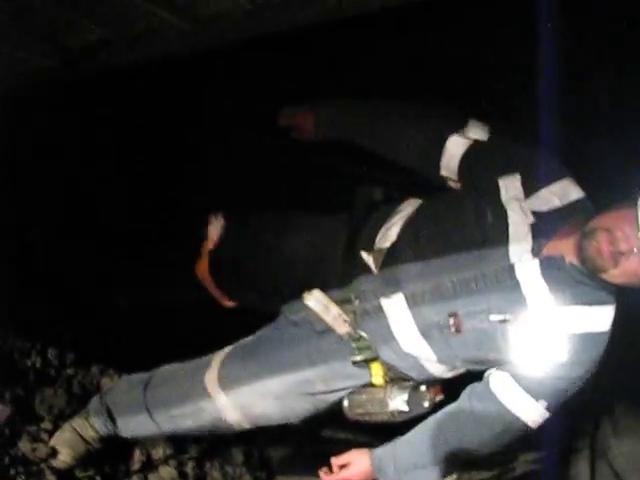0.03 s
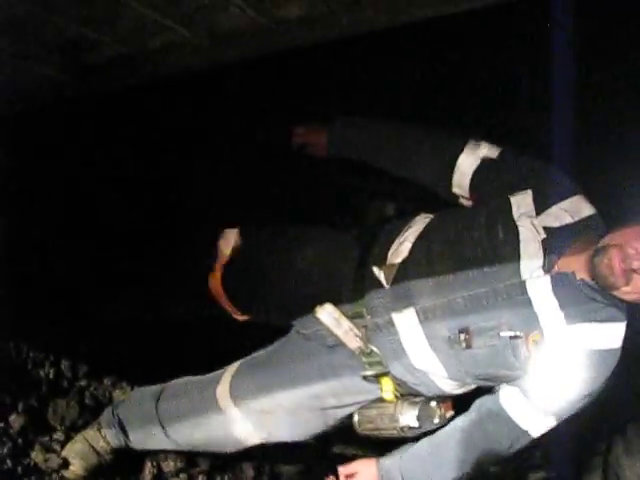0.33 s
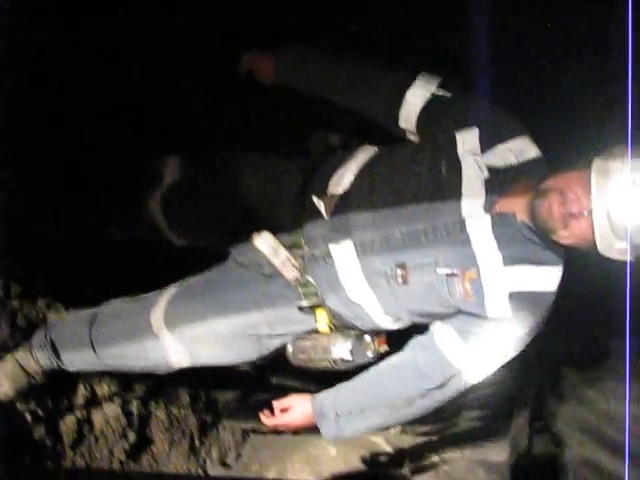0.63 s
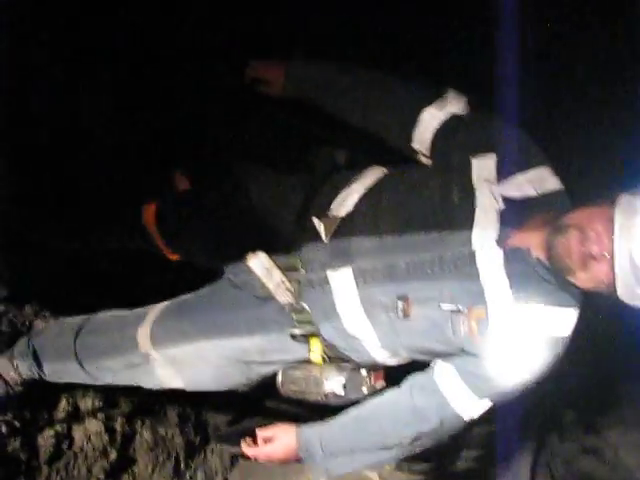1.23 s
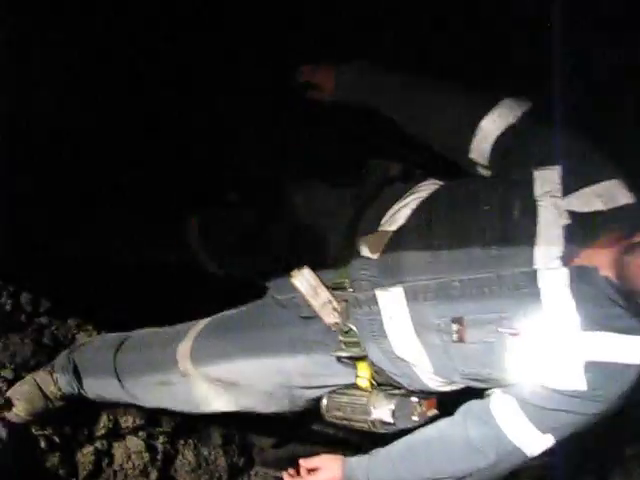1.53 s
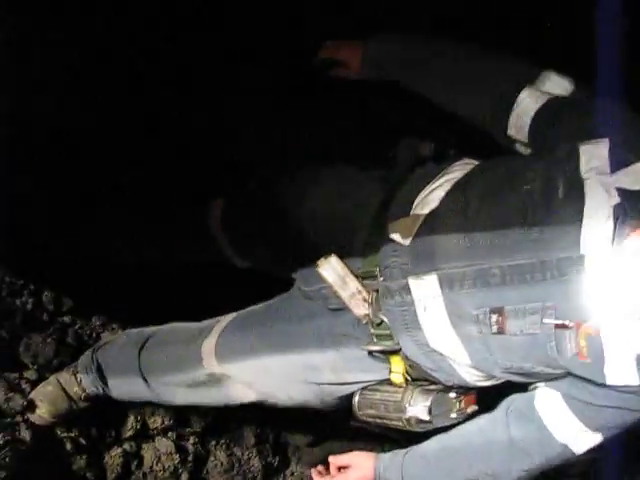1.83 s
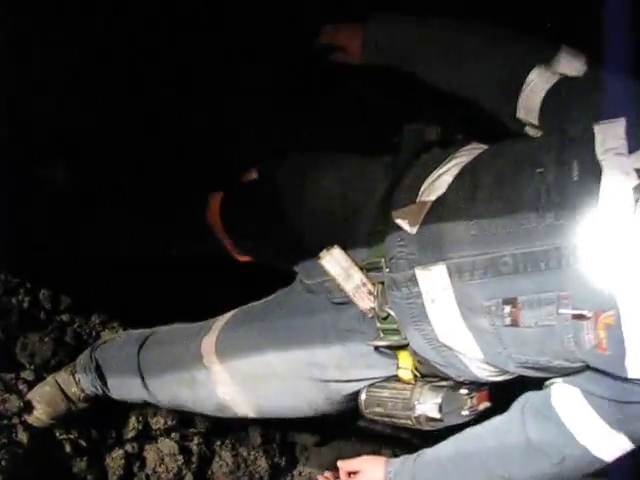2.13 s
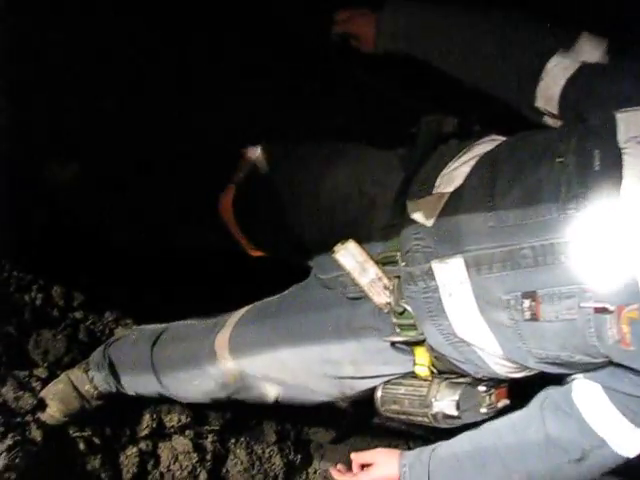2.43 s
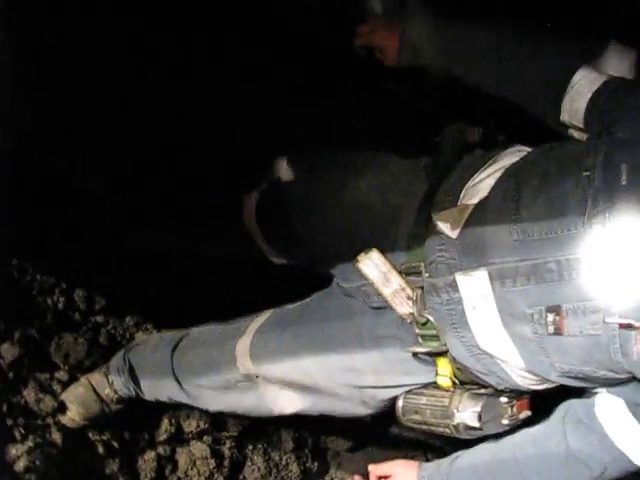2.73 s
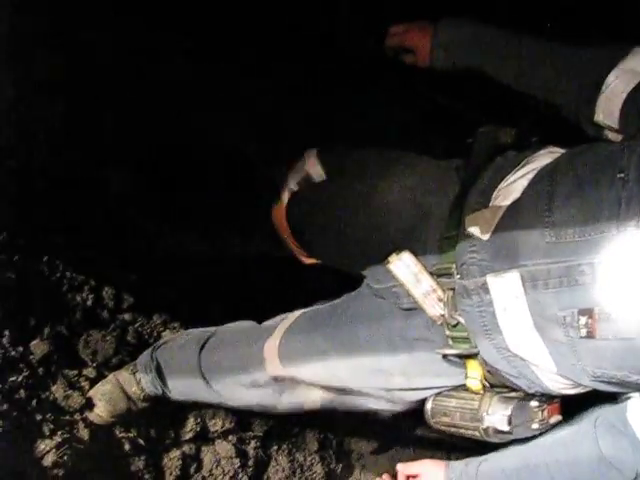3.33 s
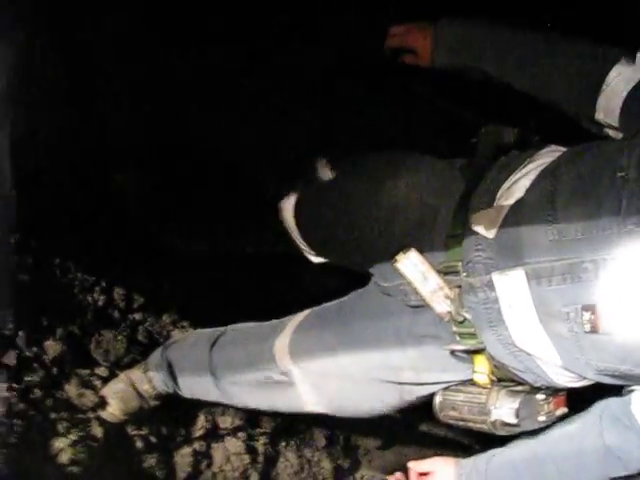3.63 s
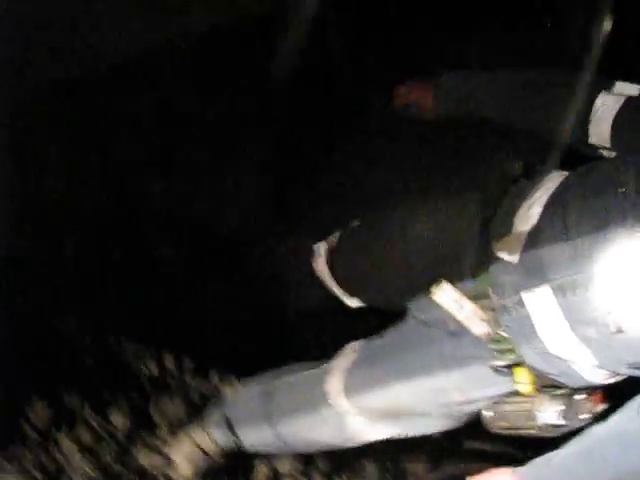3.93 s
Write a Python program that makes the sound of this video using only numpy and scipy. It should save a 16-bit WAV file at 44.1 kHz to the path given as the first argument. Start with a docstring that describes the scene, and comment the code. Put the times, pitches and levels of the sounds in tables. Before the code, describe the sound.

Wind rumbles and buffets the microphone over a steady rush of air in a mine.

```python
"""Ventilation draught in a mine passage

Air rushes steadily along the passage with a roar, hollow resonances and a hiss. The draught hits
the two microphone ports, each in its own way: eddies rumble, grow brighter as it strengthens and
overload the microphone. The strongest gusts spit and crackle. One thin tick sounds, perhaps grit."""
import sys
import numpy as np
from scipy import signal
from scipy.io import wavfile

SR = 44100
rng = np.random.default_rng(int(sys.argv[2]) if len(sys.argv) > 2 else 0)


def persist_wave(psi):
    """Save psi, clipped to +-1, as 16-bit WAV."""
    counts = np.round(np.clip(psi, -1, 1) * 32767).astype(np.int16)
    wavfile.write(sys.argv[1], SR, np.atleast_2d(counts).T)


N = 4 * SR


def from_db(db):
    """Decibels to gain."""
    return 10 ** (np.asarray(db) / 20)


def in_time(rows):
    """Rows of (time_s, value) interpolated to every sample."""
    return np.interp(np.arange(N) / SR, *np.transpose(rows))


def at_hz(rows, hz):
    """Rows of (freq_hz, value) read on a log-frequency axis."""
    freq_hz, value = np.transpose(rows)
    return np.interp(np.log(hz), np.log(freq_hz), value)


def drift(rate_hz):
    """Smooth random wander with a standard deviation of 1."""
    hop, settle = 20, 2000
    pole = np.exp(-2 * np.pi * rate_hz * hop / SR)
    white = rng.standard_normal(N // hop + settle + 2)
    slow = signal.lfilter([1], [1, -2 * pole, pole * pole], white)[settle:]
    return np.interp(np.arange(N) / hop, np.arange(len(slow)), slow / slow.std())


def bands(low_hz, high_hz, count):
    """Yields each band's centre_hz and two independent noises at 0 dB per Hz."""
    edges_hz = np.geomspace(low_hz, high_hz, count + 1)
    white = rng.standard_normal((2, 2, N + SR // 10))
    for k, (low, high) in enumerate(zip(edges_hz, edges_hz[1:])):
        sos = signal.butter(2, [low, high], "band", fs=SR, output="sos")
        pair = signal.sosfilt(sos, white[k % 2])[:, -N:]
        yield np.sqrt(low * high), pair / pair.std(axis=1, keepdims=True) * np.sqrt(high - low)


def stereo(pair, correlation):
    """Two noises mixed to a given left-right correlation."""
    mid = np.sqrt((1 + correlation) / 2) * pair[0]
    side = np.sqrt((1 - correlation) / 2) * pair[1]
    return np.array([mid + side, mid - side])


def burst(start_s, decay_s, low_hz, high_hz):
    """Band noise that starts at once near unit rms and dies away."""
    age_s = np.arange(N) / SR - start_s
    envelope = (age_s >= 0) * np.exp(-np.minimum(abs(age_s) / decay_s, 20))
    sos = signal.butter(2, [low_hz, high_hz], "band", fs=SR, output="sos")
    noise = signal.sosfilt(sos, rng.standard_normal(N) * envelope)
    return noise * np.linalg.norm(envelope) / np.linalg.norm(noise)


def bump(peak_s, rise_s, fall_s):
    """Gaussian pulse of height 1 with separate rise and fall widths."""
    age_s = np.arange(N) / SR - peak_s
    width_s = np.where(age_s < 0, rise_s, fall_s)
    return np.exp(-np.minimum((age_s / width_s) ** 2, 20) / 2)


# roar spectrum at 0 dB gain: freq_hz, density_db_per_hz
ROAR_SPECTRUM = [(150, -51), (450, -71.5), (700, -69.5), (1200, -76), (1700, -72), (2300, -78.5),
                 (3100, -81), (3700, -89), (5000, -92.5), (8000, -102)]
# roar envelope: time_s, gain_db
ROAR_GAIN = [(0, 1), (.18, -1), (.32, -6), (.55, -1), (1.0, -1), (1.25, 0), (1.5, -5), (2.0, -7),
             (3.0, -10), (4, -16)]
# left-right likeness of roar and resonances: freq_hz, correlation
PASSAGE_CORRELATION = [(200, 0.53), (1000, 1), (2000, 1), (3800, 0.3), (7000, .3)]


def roar():
    """Air moving along the passage makes a broad roar."""
    noise = sum(from_db(at_hz(ROAR_SPECTRUM, hz)) * stereo(pair, at_hz(PASSAGE_CORRELATION, hz))
                for hz, pair in bands(150, 9000, count=14))
    return from_db(in_time(ROAR_GAIN)) * noise


# passage modes at 0 dB gain: pitch_hz, width_hz, peak_db_per_hz, left_minus_right_db
PASSAGE_MODES = [(324, 106, -56.5, 0), (870, 76, -69.5, -2), (1670, 270, -74, -5), (1870, 150, -85.5, -14),
                 (2440, 124, -77, -11), (2870, 200, -76, -9)]
# envelope of all modes: time_s, gain_db
MODE_GAIN = [(0, -0.5), (.5, -0.5), (1.0, -1.5), (1.3, -3.5), (1.6, -2), (2.0, -6.5), (3.0, -11.5), (4, -4)]


def resonances(waver_db=3, waver_hz=4):
    """Noise rings in the passage's hollow modes; each swells and fades on its own."""
    out = 0
    for hz, width_hz, peak_db, pan_db in PASSAGE_MODES:
        level_db = peak_db + np.array([[pan_db], [-pan_db]]) / 2 + waver_db * drift(waver_hz)
        noise = stereo(rng.standard_normal((2, N)), at_hz(PASSAGE_CORRELATION, hz)) * np.sqrt(SR / 2)
        radius = np.exp(-np.pi * width_hz / SR)
        feedforward = np.array([1, 0, -1]) * (1 - radius ** 2) / 2
        feedback = [1, -2 * radius * np.cos(2 * np.pi * hz / SR), radius ** 2]
        out += from_db(level_db) * signal.lfilter(feedforward, feedback, noise)
    return from_db(in_time(MODE_GAIN)) * out


# hiss spectrum at 0 dB gain: freq_hz, density_db_per_hz
HISS_SPECTRUM = [(1500, -81), (3500, -85), (5200, -85.5), (6500, -90.5), (9000, -90), (12000, -95.5),
                 (15500, -97.5)]
# hiss envelope: time_s, gain_db
HISS_GAIN = [(0, 3), (.18, 2.5), (.32, -1), (.55, 3.5), (1.0, 2), (1.28, -1), (1.45, -4), (2.0, -9),
             (3.0, -7.5), (4, -11.5)]


def hiss(left_gain_db=1.9):
    """The moving air's diffuse treble, leaning left."""
    noise = sum(from_db(at_hz(HISS_SPECTRUM, hz)) * pair for hz, pair in bands(1500, 17000, count=9))
    gain = from_db(in_time(HISS_GAIN)) * from_db([[left_gain_db], [0]])
    return gain * stereo(noise, correlation=0.023)


# slow swells at each port: time_s, force_db
SWELLS_LEFT = [(0, -10.5), (.35, -5.5), (.58, -5), (.85, -6.5), (1.15, -5), (1.6, -3.5), (2.0, -3.5),
               (2.2, -1.5), (2.5, 3.5), (2.66, 2), (2.82, 3.5), (3.0, -1), (3.2, 3), (3.32, -1.5),
               (3.42, 0), (3.7, 0), (3.95, -8)]
SWELLS_RIGHT = [(0, -8), (.18, 0), (.45, -9.5), (.62, -24.5), (1.02, -19.5), (1.3, -7), (1.45, -2.5),
                (1.9, -1.5), (2.05, 1.5), (2.55, 2), (2.72, 3.7), (2.85, 3.5), (3.15, 5.5), (3.3, 10.5),
                (3.39, 8.5), (3.53, 0.5), (3.63, 4), (4, 3)]
# puffs added to the swells: peak_s, fall_s, left_db, right_db
DRAUGHT_PUFFS = [(0.19, 0.013, 12, -2), (0.784, 0.012, -2, 16), (1.102, 0.014, 7.5, 12),
                 (1.125, 0.01, 7.5, 2), (1.468, 0.012, 2.5, 2), (1.515, 0.018, 0.5, 4.5),
                 (1.631, 0.015, 4.5, 3), (1.819, 0.0064, 4, 6), (1.968, 0.069, 3.5, 3.5),
                 (2.264, 0.0078, 10, 1), (2.343, 0.018, -15, 5), (2.572, 0.018, 1.5, -1),
                 (2.615, 0.032, 2, 6), (2.766, 0.028, 3.5, 0), (2.846, 0.049, 5, 3.5),
                 (3.094, 0.028, -1.5, 2), (3.439, .015, 0.5, 1.5), (3.541, 0.0043, 4, 2),
                 (3.684, 0.019, 8.5, 1), (3.774, 0.02, 1, 2.5)]


def draught_force_db(rise_s=0.0019):
    """Force on each port: slow swells plus puffs that hit fast and ease off."""
    force_db = np.array([in_time(SWELLS_LEFT), in_time(SWELLS_RIGHT)])
    for peak_s, fall_s, left_db, right_db in DRAUGHT_PUFFS:
        force_db += np.array([[left_db], [right_db]]) * bump(peak_s, rise_s, fall_s)
    return force_db


# eddy spectrum at each port at 0 dB force: freq_hz, relative_db
EDDY_SPECTRUM_LEFT = [(20, -7), (45, 0), (90, 1.5), (170, -7.5), (300, -11.5), (600, -27.5), (1200, -42),
                      (3000, -54.5)]
EDDY_SPECTRUM_RIGHT = [(20, -8), (45, -6.5), (90, 0), (170, -3), (300, -11.5), (600, -26), (1200, -40.5),
                       (3000, -65)]
# growth with force, fastest for small eddies: freq_hz, db_per_force_db
EDDY_GROWTH = [(30, -0.07), (60, 0.47), (120, 0.81), (240, 1.0), (480, 1.5), (1500, 1.5)]
# flutter common to a port's bands: freq_hz, depth_db
EDDY_FLUTTER = [(50, 1.3), (200, 3.5), (600, 2), (2000, 6.5)]
# envelope of the deepest rumble: time_s, left_db, right_db
RUMBLE_GAIN = [(0, -3, -4), (.52, -7.5, 6), (.65, 2.5, 0), (1.3, 4.5, -2.5), (1.6, -2.5, -5),
               (2.6, -1.5, 3), (4, 1.5, -7)]


def buffeting(force_db, base_db_per_hz=-32, flutter_hz=56, band_flutter_hz=11, rumble_top_hz=71):
    """Eddies on each port: louder and brighter with the force, the small ones coming in flurries."""
    port_flutter = np.array([drift(flutter_hz), drift(flutter_hz)])
    rumble_db = np.array([in_time([(row[0], row[port]) for row in RUMBLE_GAIN]) for port in (1, 2)])
    out = 0
    for hz, pair in bands(18, 3000, count=15):
        colour_db = np.array([[at_hz(EDDY_SPECTRUM_LEFT, hz)], [at_hz(EDDY_SPECTRUM_RIGHT, hz)]])
        growth_db = at_hz(EDDY_GROWTH, hz) * force_db
        band_flutter = np.array([drift(band_flutter_hz), drift(band_flutter_hz)])
        flutter_db = at_hz(EDDY_FLUTTER, hz) * (port_flutter + 0.5 * band_flutter)
        rumble_share = 1 / (1 + (hz / rumble_top_hz) ** 4)
        level_db = base_db_per_hz + colour_db + growth_db + flutter_db + rumble_share * rumble_db
        correlation = at_hz([(40, 0.5), (90, 0.14), (200, 0.034)], hz)
        out += from_db(level_db) * stereo(pair, correlation)
    return out


# crackle spectrum at 0 dB gain: freq_hz, density_db_per_hz
CRACKLE_SPECTRUM = [(700, -74), (1500, -80), (3000, -83.5), (4500, -92.5), (7000, -101.5), (15000, -110)]


def crackle(force_db, pressure, grain_db=6, grain_hz=410, clump_db=3, clump_hz=7.9):
    """Strong air tears at a port in clumps of very short hisses that swell with each eddy."""
    db_per_force_db, eddy_share, typical_pressure = 0.91, 0.22, 0.31
    noise = sum(from_db(at_hz(CRACKLE_SPECTRUM, hz)) * pair for hz, pair in bands(700, 16000, count=8))
    gain_db = db_per_force_db * force_db
    for port in range(2):
        gain_db[port] += grain_db * np.minimum(drift(grain_hz), 2.5)
        gain_db[port] -= clump_db * np.tanh(drift(clump_hz))
    eddy_gain = 1 - eddy_share + eddy_share * np.minimum(abs(pressure) / typical_pressure, 3)
    return eddy_gain * from_db(gain_db) * noise


# port saturation: time_s, ceiling_amplitude
PORT_CEILING = [(0, 0.59), (1.2, 0.44), (2.0, 0.44), (4, 0.48)]


def overload(pressure, knee_hardness=14):
    """The microphone flattens the tops of the strongest eddies."""
    drive = abs(pressure / in_time(PORT_CEILING))
    return pressure / (1 + drive ** knee_hardness) ** (1 / knee_hardness)


# eddy impacts: start_s, decay_s, left_db, right_db
EDDY_SLAPS = [(0.191, 0.0097, -11, -46.5), (0.228, .005, -12, -49), (.242, .004, -38, -17.5),
              (1.641, 0.0029, -22.5, -30), (1.82, 0.0031, -20, -17), (1.973, 0.0055, -36, -18.5),
              (2.209, 0.0023, -33, -10), (2.337, 0.0052, -38, -8), (2.499, 0.0051, -32, -8),
              (2.764, 0.0097, -21, -22), (2.789, 0.0067, -25, -12), (2.869, 0.011, -22, -14),
              (2.944, .005, -33, -8), (3.054, 0.018, -15, -25), (3.585, 0.0038, -35, -9)]


def slaps(low_hz=212, high_hz=787):
    """Single eddies hit a port with a dull knock."""
    return sum(from_db([[left_db], [right_db]]) * burst(start_s, decay_s, low_hz, high_hz)
               for start_s, decay_s, left_db, right_db in EDDY_SLAPS)


# dips in the draught, and one lift: centre_s, width_s, gain_db
DRAUGHT_LULLS = [(0.217, .005, -6), (0.28, 0.014, -4), (.972, 0.0083, -20), (1.786, 0.014, 3.5),
                 (1.935, 0.011, -5.5), (2.207, .008, -5), (2.528, .012, -7), (2.84, 0.0073, -4.5),
                 (3.503, 0.0082, -5)]


def lulls():
    """Gain of the buffeting: it sinks briefly between eddies and lifts once."""
    return from_db(sum(gain_db * bump(centre_s, width_s, width_s)
                       for centre_s, width_s, gain_db in DRAUGHT_LULLS))


# spits of air: start_s, pitch_hz, left_db, right_db
AIR_SPITS = [(.232, 2000, -30, -50), (2.261, 3200, -28, -37), (2.337, 3800, -44, -27),
             (2.368, 3000, -50, -26), (2.393, 2580, -22, -45), (2.853, 1400, -32, -13),
             (2.861, 3400, -32, -32), (2.883, 3000, -37, -24), (3.064, 3000, -40, -23),
             (3.098, 4400, -44, -28), (3.209, 3600, -32, -40), (3.304, 3460, -44, -22),
             (3.351, 4400, -44, -33), (3.412, 3400, -46, -27), (3.542, 2400, -33, -49),
             (3.688, 3000, -44, -34), (3.808, 3150, -42, -23)]


def spits(decay_s=0.00098, edge_ratio=1.18):
    """Sharp spits of air, each at its own pitch and mostly on one port."""
    return sum(from_db([[left_db], [right_db]]) * burst(start_s, decay_s, hz / edge_ratio, hz * edge_ratio)
               for start_s, hz, left_db, right_db in AIR_SPITS)


def tick(left_db=-38, right_db=-28):
    """One thin, very high tick to the right, perhaps grit."""
    click = burst(start_s=0.959, decay_s=0.0006, low_hz=9500, high_hz=12500)
    return from_db([[left_db], [right_db]]) * click


def scene():
    """Wind on the microphone in front of the passage's rush."""
    force_db = draught_force_db()
    pressure = lulls() * buffeting(force_db) + slaps()
    wind = overload(pressure) + crackle(force_db, pressure) + spits()
    return wind + tick() + roar() + resonances() + hiss()


def record(dry, low_cut_hz=2.4, high_cut_hz=15800):
    """A low cut tilts the flattened tops; the top of the treble is cut steeply."""
    low_cut = signal.butter(1, low_cut_hz, "high", fs=SR, output="sos")
    high_cut = signal.ellip(12, 0.1, 90, high_cut_hz, fs=SR, output="sos")
    return signal.sosfilt(high_cut, signal.sosfilt(low_cut, dry))


dry = scene()
out = record(dry)
persist_wave(out)
```